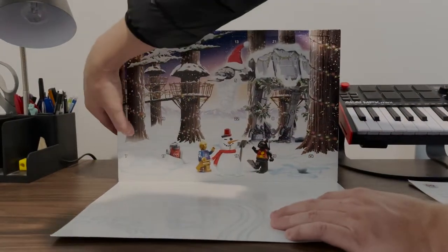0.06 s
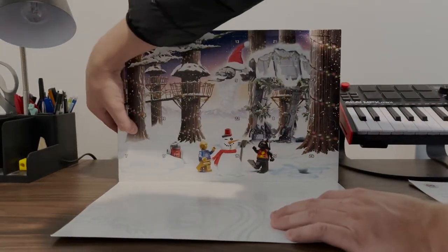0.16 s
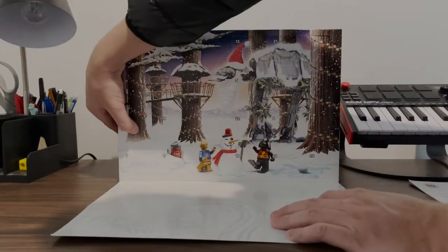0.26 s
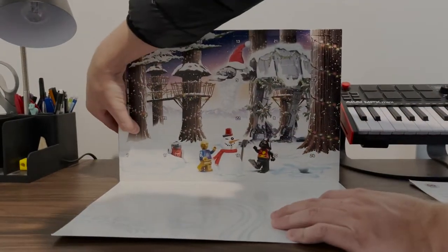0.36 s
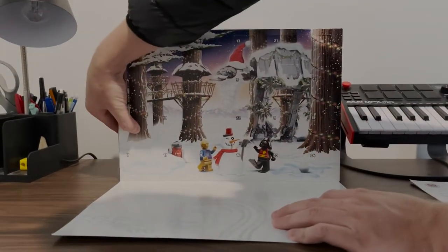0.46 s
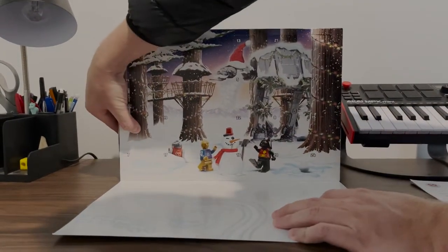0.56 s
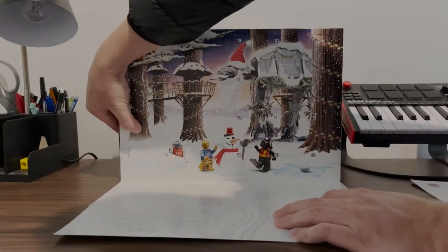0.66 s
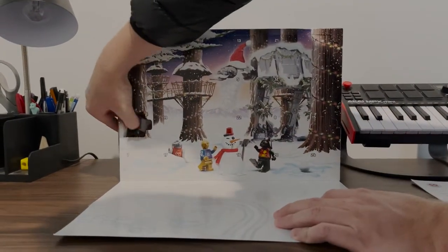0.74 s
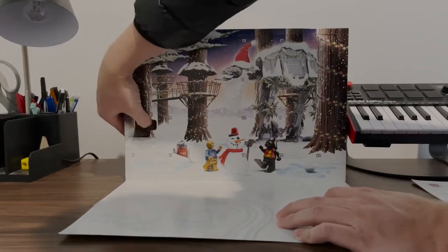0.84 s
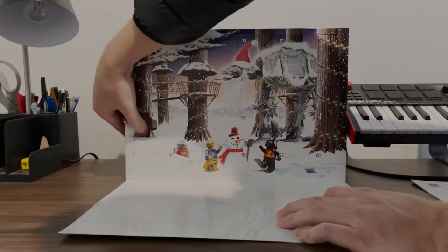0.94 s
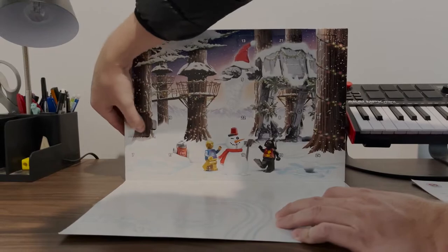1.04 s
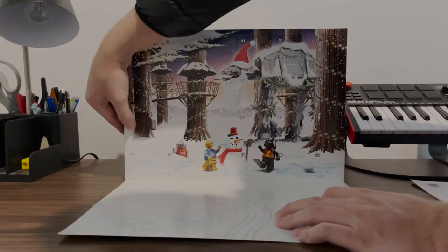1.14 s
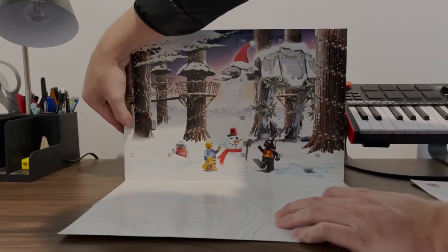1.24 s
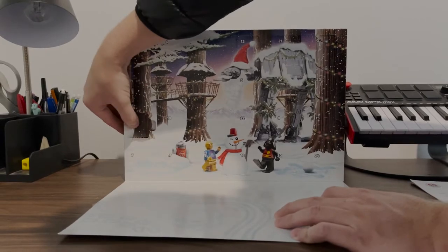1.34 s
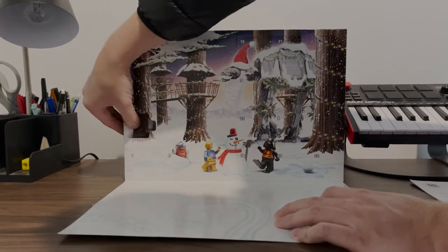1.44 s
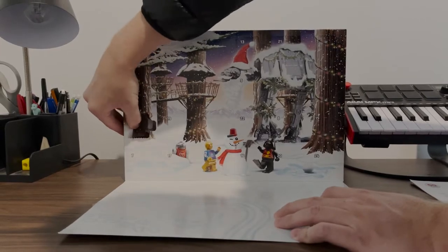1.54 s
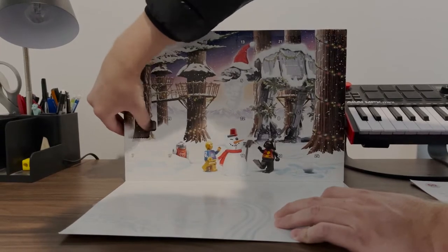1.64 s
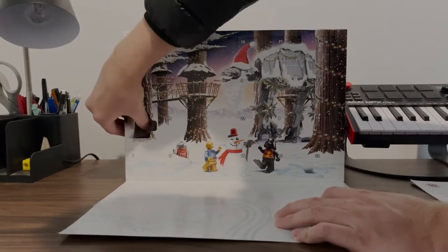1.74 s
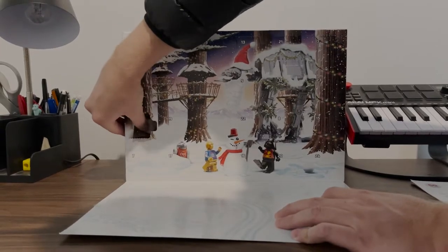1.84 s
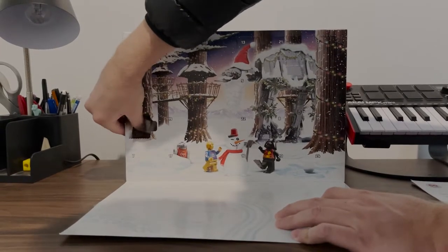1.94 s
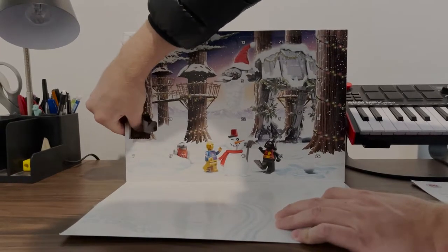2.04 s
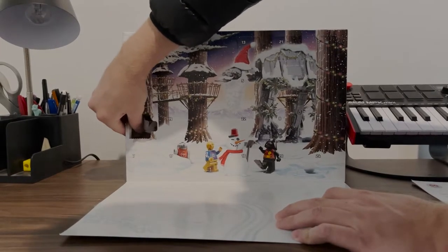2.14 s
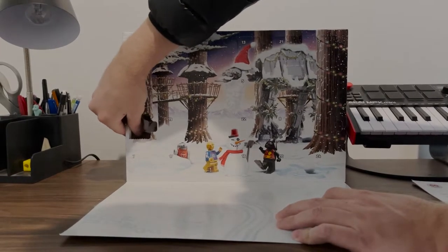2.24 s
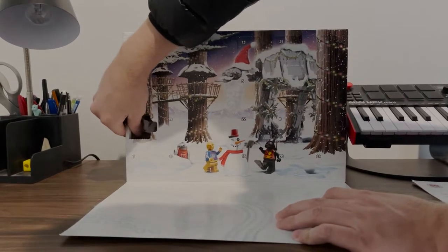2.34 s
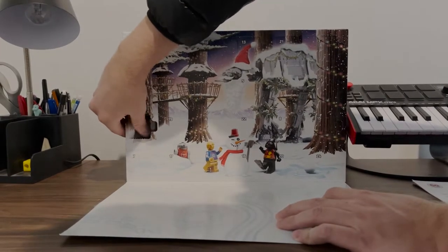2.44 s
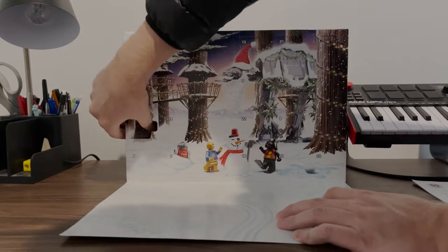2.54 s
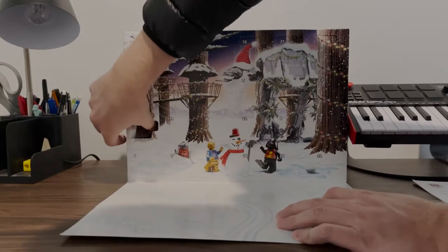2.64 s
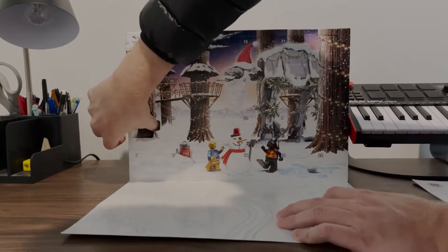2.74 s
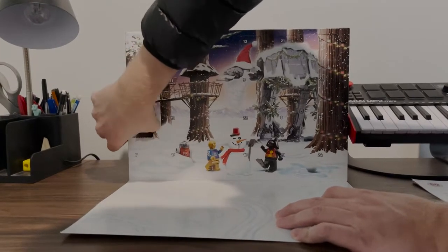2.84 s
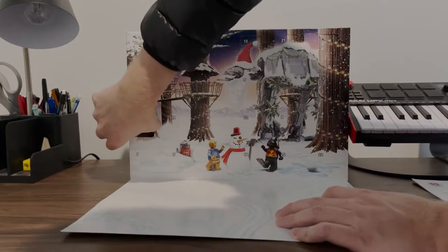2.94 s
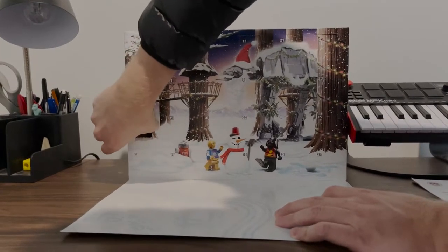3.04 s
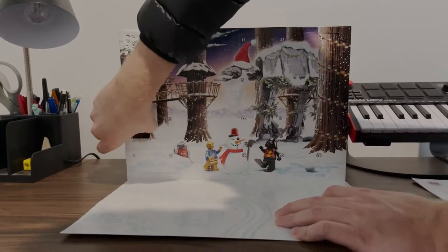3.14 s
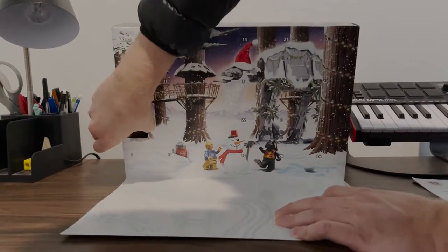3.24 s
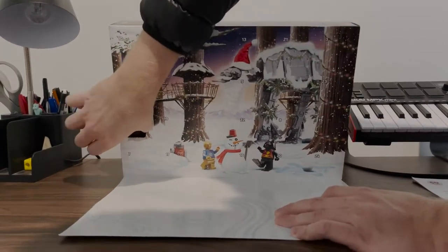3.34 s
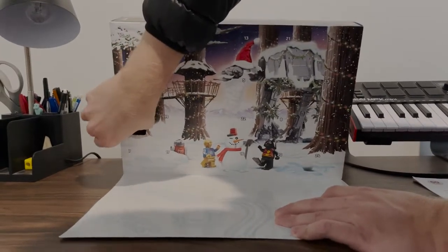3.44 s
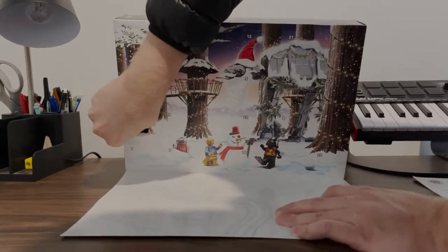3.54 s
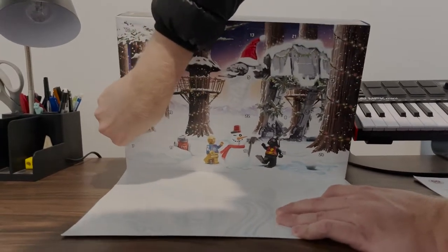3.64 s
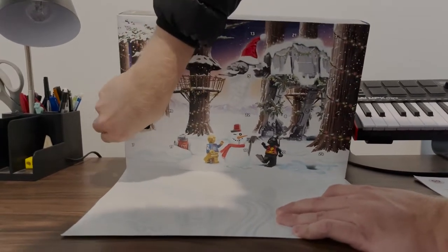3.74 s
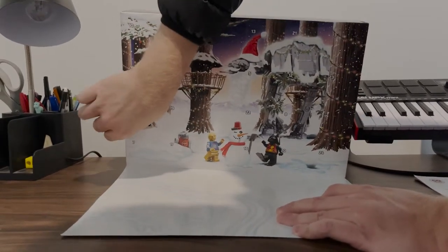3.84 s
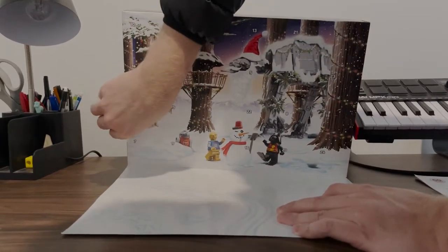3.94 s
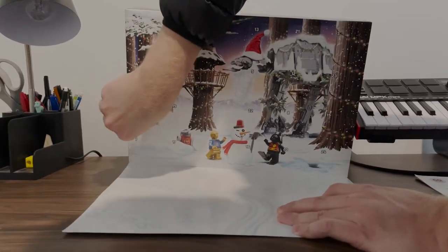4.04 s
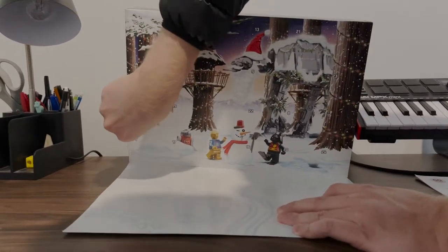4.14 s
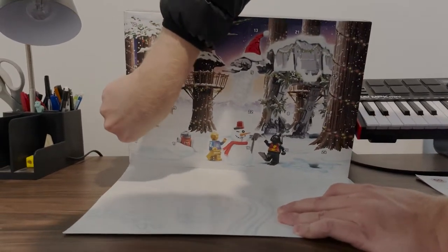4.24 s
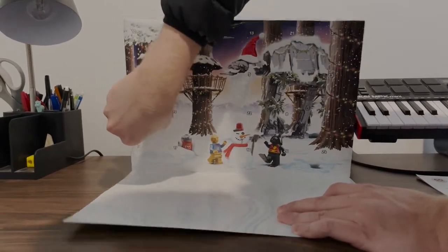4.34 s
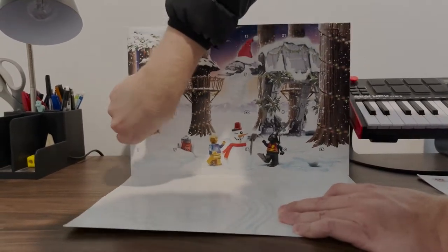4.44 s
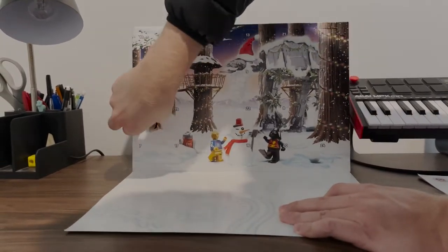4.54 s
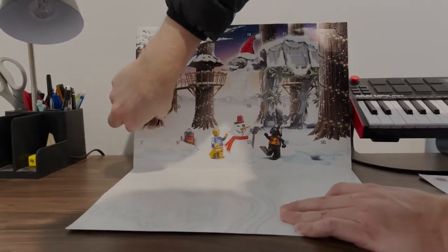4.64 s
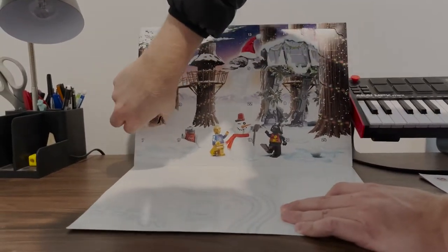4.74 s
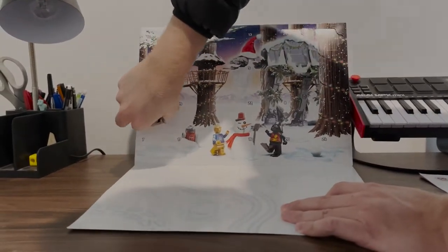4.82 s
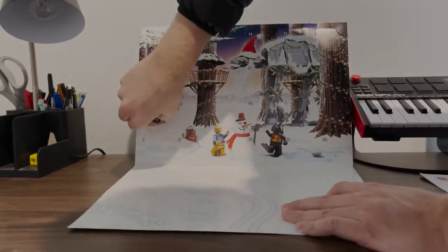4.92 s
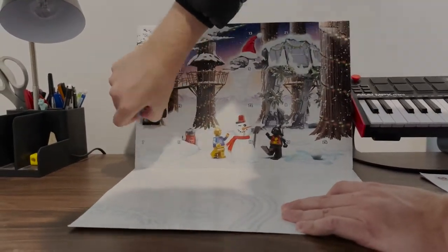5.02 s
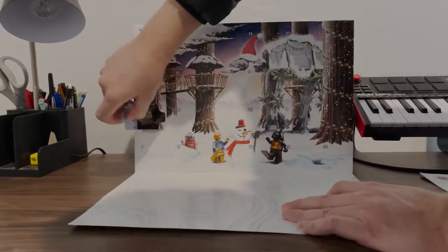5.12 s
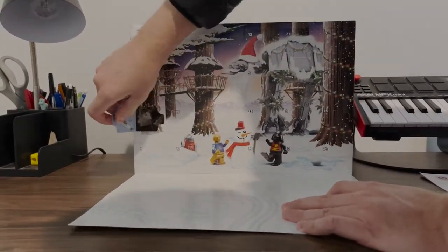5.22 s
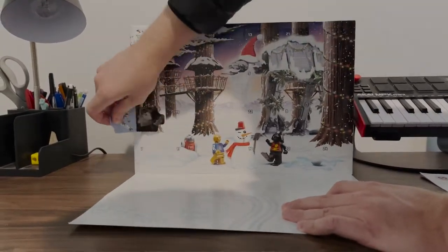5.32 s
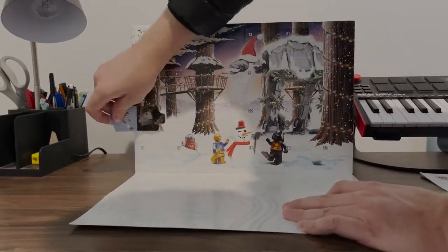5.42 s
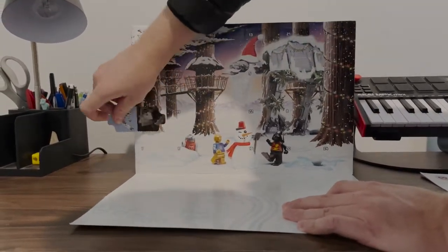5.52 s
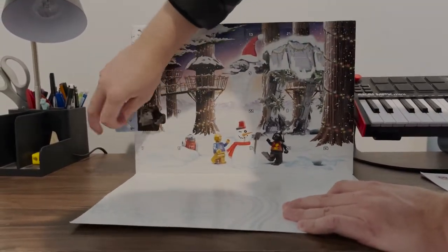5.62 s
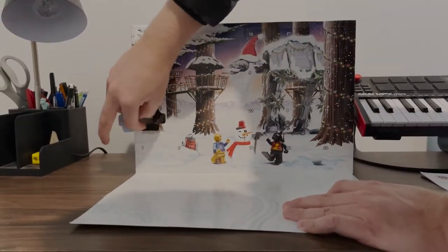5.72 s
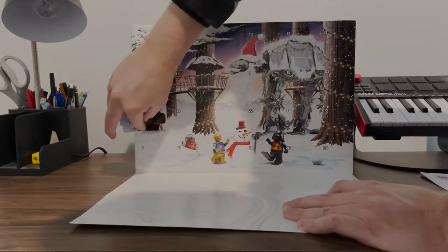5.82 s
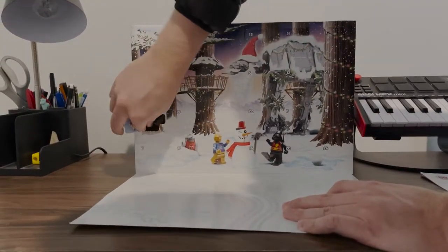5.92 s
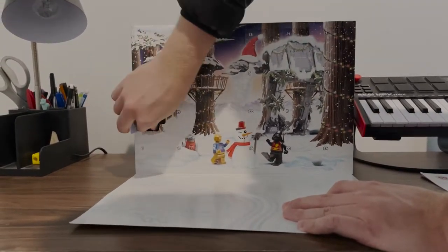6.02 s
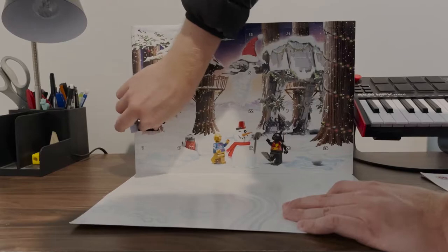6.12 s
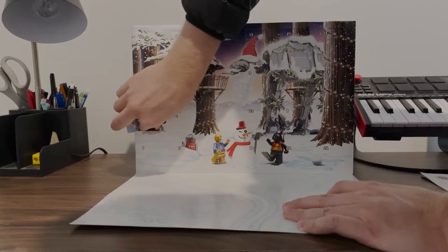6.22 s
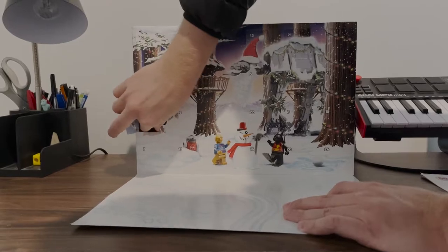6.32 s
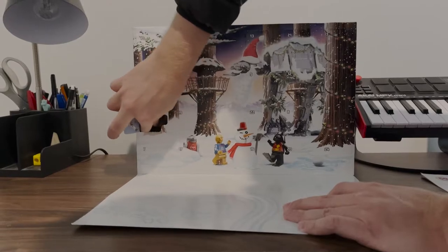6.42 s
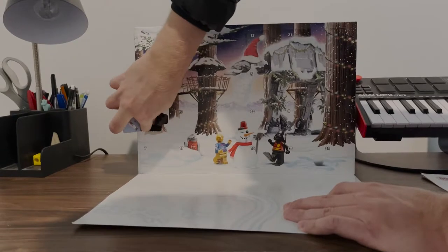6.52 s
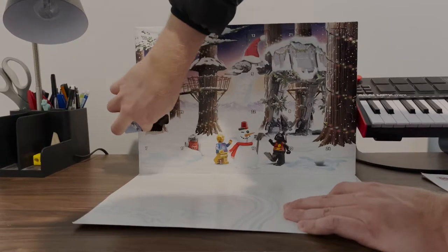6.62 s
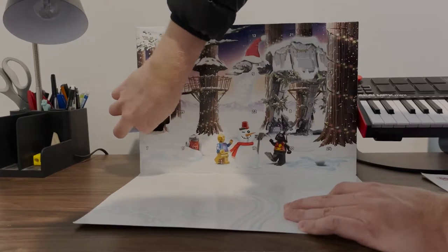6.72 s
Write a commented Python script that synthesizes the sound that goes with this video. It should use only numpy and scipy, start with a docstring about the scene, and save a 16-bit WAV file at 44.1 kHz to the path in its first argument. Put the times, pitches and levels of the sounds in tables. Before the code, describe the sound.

Close cardboard cracks and hollow thumping pops, loudest midway, separated by quiet finger scrapes and soft sleeve rustle in a quiet, bare room.

```python
"""A perforated door is pushed in and torn open in a cardboard calendar box on a desk, in a small bare room.
Paper bridges crack one by one or rip in quick runs, made from shaped noise bursts.
The hollow box pops as its face buckles, made from short swelling modes and gliding notes.
In between, fingers rub, scrape, catch and judder on the card and a jacket sleeve rustles, mostly from
random grains. Nearby scatter, room echoes and a quiet noise bed surround it all."""
import sys
import numpy as np
from scipy import signal
from scipy.fft import rfft, irfft, next_fast_len
from scipy.io import wavfile

SR = 44100
rng = np.random.default_rng(int(sys.argv[2]) if len(sys.argv) > 2 else 0)


def dump_mix(stems):
    """Bounce the given channels to the path in sys.argv[1] as a 16-bit WAV at rate SR."""
    frames = np.atleast_2d(stems).T  # one column per channel
    limited = np.clip(frames, -1, 1)  # hard clip at full scale
    pcm = np.round(limited * 32767).astype(np.int16)
    wavfile.write(sys.argv[1], SR, pcm)


N = 298632
TIME = np.arange(N) / SR  # seconds

# Source levels are set ahead of the room, the ports and the overall colour; all spectra are relative.
# Single cracks, loud and faint, at set times. Each row: start in seconds, treble level in dB,
# level of the card's midrange in dB before the trim shared by all cracks.
PLACED_CRACKS = [(0.615, -40.5, -46), (0.6377, -34.5, -47.5), (0.8207, -21.5, -34), (1.0172, -40.5, -41.5),
                 (1.0752, -29, -26.5), (1.3926, -41.5, -39), (1.559, -35, -40.5), (1.5769, -31.5, -36),
                 (1.8643, -22.5, -60), (1.9053, -28.5, -35), (1.9415, -27.5, -35), (1.981, -24, -30),
                 (1.9925, -22.5, -32), (2.104, -40, -52), (2.3594, -29, -30.5), (2.3737, -32, -45),
                 (2.398, -26, -37), (2.411, -23.5, -26), (2.4365, -26, -30), (2.6451, -40, -43.5),
                 (2.749, -36, -46), (2.787, -35.5, -36), (2.8191, -26, -38.5), (2.9594, -26, -30.5),
                 (3.0068, -30, -36), (3.018, -40.5, -27.5), (3.135, -33, -30), (3.926, -43, -39),
                 (3.96, -37, -36), (4.1229, -36, -39.5), (4.335, -25.5, -25.5), (4.356, -15.5, -19),
                 (4.486, -40, -31), (4.8393, -22, -24), (4.8601, -26, -14.5), (4.876, -27, -35),
                 (4.912, -30.5, -18), (4.9548, -30.5, -30), (5.4855, -39, -61), (5.7882, -36.5, -41),
                 (6.0732, -35, -42.5), (6.105, -39, -38.5), (6.172, -34, -48), (6.322, -39.5, -52),
                 (6.4202, -19, -27.5), (6.726, -24, -45)]
# More cracks at random moments in these spans. Each row: start in seconds, end in seconds,
# mean treble level in dB.
TEARING_SPANS = [(0.785, 0.846, -32), (1.79, 2.013, -40.5), (2.366, 2.447, -42), (2.747, 2.841, -41.5),
                 (4.931, 4.974, -37.5)]
CRACKLE_PER_S, CRACKLE_SPREAD_DB, CRACKLE_CARD_DB = 65, 0.5, -3.5
# The bright snap of a bridge. Each row: frequency in Hz, level in dB per Hz.
SNAP_SPECTRUM = [(1500, -16), (3500, -13.5), (5500, -2), (7500, 0.5), (9000, 6), (12000, 0.5)]
# The card around a break, before its random shift. Each row: frequency in Hz, level in dB per Hz.
CARD_SPECTRUM = [(300, -16), (700, -2), (1500, -0.5), (2700, -2.5), (5000, -8.5), (9000, -38.5)]
CARD_SPREAD_OCT = 0.49  # random pitch spread of the card, octaves
STRAIN_S = 0.004        # creaking lead-in to a break, seconds
SNAP_EVENNESS = 0.6     # 0: a ragged spectrum, 1: a smooth one
# A break drags a weaker one after it, deeper in the card: longest delay in seconds, level in dB
SPLINTER_S, SPLINTER_DB = 0.006, -11.5
# Runs of fibres giving way together. Each row: start in seconds, length before the fade in seconds,
# level in dB, treble shelf against the rest in dB.
RIP_RUNS = [(0.707, 0.0044, -11, 6), (1.689, 0.018, -47, -6), (2.733, 0.053, -43.5, -22),
            (4.287, 0.0069, -30, -2), (4.36, 0.017, -26, -7), (4.84, 0.031, -41, -38),
            (4.881, 0.0077, -32, -25), (4.943, 0.029, -34.5, -15), (5.419, 0.022, -49.5, 24),
            (6.4179, 0.0061, -25, -34), (6.722, 0.014, -40, -9.5), (6.763, 0.0057, -42, -25)]
# The rip ahead of its treble shelf. Each row: frequency in Hz, level in dB per Hz.
RIP_SPECTRUM = [(50, -13), (150, -2), (300, 3), (520, -0.5), (720, 5.5), (1000, -4.5), (1900, -5),
                (3000, -12.5), (6500, -15), (9000, -9.5), (12000, -14.5)]

# The face buckling or being bumped. Each row: start in seconds, level in dB before the shared trim,
# tuning in Hz that the box settles to.
FACE_POPS = [(0.122, -43.5, 405), (0.386, -41, 442), (0.49, -40, 350.6), (0.711, -18, 163.7),
             (0.719, -13.5, 398), (0.841, -32, 393), (1.559, -33, 302), (1.688, -36, 394),
             (2.35, -30.5, 430), (2.63, -27, 400), (3.378, -32.5, 392), (3.47, -36, 367), (3.602, -37, 378),
             (3.844, -40, 392.5), (3.88, -36, 351.5), (4.2811, -29, 401), (4.289, -16.5, 337),
             (4.358, -1.5, 387), (4.409, -18, 410), (4.843, -23.5, 403), (4.882, -13, 429),
             (4.889, -15.5, 423.3), (5.223, -38, 276.6), (6.075, -37, 432), (6.459, -28, 333),
             (6.595, -35.5, 399)]
# After each pop the face springs back: delay in seconds, level in dB, tuning as a share of the pop's
REBOUND_S, REBOUND_DB, REBOUND_PITCH = 0.019, -13, 0.62
# A torn flap springs free and rings. Each row: start in seconds, level in dB before the shared trim.
FREED_FLAPS = [(0.708, -19.5), (4.8845, -20.5), (6.422, -28.5)]
FLAP_HZ = 733  # box tuning while a flap rings
# Modes of the hollow box at its reference tuning. Each row: frequency in Hz, mean level in dB,
# swell and decay time in seconds.
BOX_MODES = [(59, -32.5, 0.034), (120.9, -21.5, 0.005), (187, -25.5, 0.0068), (254.5, -12, 0.0047),
             (401, -4, 0.0044), (559.5, -17.5, 0.0051), (748, -21, 0.0054), (1373, -35.5, 0.0027)]
BOX_HZ = 405  # reference tuning
# The pressed face going slack in a falling thump. Each row: start in seconds, level in dB,
# starting pitch in Hz, fall time in seconds.
FACE_SLUMPS = [(0.709, -20.5, 461.5, 0.015), (2.041, -49, 190, 0.04), (3.926, -33, 463.3, 0.029),
               (5.603, -51, 180, 0.06), (6.423, -18, 610, 0.0269)]
# Swell as a share of the fall time, overtone as a multiple of the note, overtone level in dB
SLUMP_SWELL_SHARE, SLUMP_OVERTONE, SLUMP_OVERTONE_DB = 0.31, 1.7, -14

# The hand moving on the card. Each row: start in seconds, end in seconds, rubbing level in dB,
# weight in dB (above 0 it leans on the box, below 0 it skims).
HAND_STROKES = [(0.241, 0.554, -55.5, -2), (0.838, 0.893, -38.5, -7), (1.392, 1.755, -59.5, 11),
                (1.804, 2.028, -56, -2), (2.354, 2.499, -48, -6), (2.73, 2.848, -42, -5.5),
                (3.242, 3.408, -50, -7), (3.479, 3.64, -57, 17.5), (3.922, 3.996, -50.5, 12.5),
                (4.283, 4.355, -32, 4), (4.37, 4.451, -31, 1.5), (4.705, 4.838, -55.5, -0.5),
                (4.844, 4.976, -33, -5.5), (5.204, 5.267, -54, 8), (5.519, 5.578, -60, -20),
                (5.774, 5.904, -55.5, -1), (6.036, 6.186, -55, 5.5), (6.315, 6.434, -54, 8.5),
                (6.557, 6.777, -51, 4)]
# A firmer stroke raises rumble and scraping by these dB per dB; weight trades scraping for rumble
USUAL_STROKE_DB = -50
RUMBLE_FOLLOWS, SCRAPE_FOLLOWS, WEIGHT_MUTES_SCRAPE = 0.98, 0.82, 0.27
# The box rumbling on the desk. Each row: frequency in Hz, level in dB per Hz.
RUMBLE_SPECTRUM = [(25, -17), (55, 3), (110, -0.5), (220, -6.5), (400, -43)]
# Skin on card, before the flexing shifts it. Each row: frequency in Hz, level in dB per Hz.
RUB_SPECTRUM = [(100, -23), (270, -3), (410, 1), (740, -4), (1000, -17), (1800, -34.5)]
# Colour laid over the scraping fibres. Each row: frequency in Hz, level in dB.
SCRAPE_COLOUR = [(500, -10), (850, -1.5), (1700, 1.5), (2800, -4.5), (5500, -10.5), (9000, -4),
                 (12000, -12.5)]
# A fingertip catching on the edge of the door. Each row: start in seconds, level in dB.
EDGE_CATCHES = [(0.89, -31), (1.507, -47.5), (2.552, -41.5), (3.162, -37), (3.361, -40), (3.475, -41),
                (3.5, -40), (3.531, -41), (3.554, -48), (3.757, -38.5), (4.084, -37), (5.422, -49),
                (5.791, -41), (6.041, -46), (6.348, -45.5)]
# Modes of the small door, before random detuning. Each row: frequency in Hz, mean level in dB,
# decay time in seconds.
DOOR_MODES = [(746, -9, 0.0025), (1400, -4, 0.00093), (1900, -5, 0.0011)]
# The fingertip judders in an even run of soft knocks, every second one weaker
JUDDER_START_S, JUDDER_STEP_S = 1.017, 0.0862
JUDDER_DB, JUDDER_WEAK_DB, JUDDER_HZ = -49.5, -3.5, 208.7

# The jacket sleeve as the arm moves, before its flutter. Each row: time in seconds, level in dB.
SLEEVE_MOVES = [(1.05, -62), (1.23, -68), (2.1, -64.5), (2.3, -70), (2.55, -60), (3.3, -57.5), (4.2, -65.5),
                (4.62, -60), (5.38, -70.5), (5.55, -58.5), (5.72, -83.5), (5.85, -61.5), (5.98, -84),
                (6.1, -55.5), (6.28, -82), (6.65, -61)]
# The rustle of the cloth. Each row: frequency in Hz, level in dB per Hz.
SLEEVE_SPECTRUM = [(60, -23), (400, 4.5), (800, -9.5), (2000, -15), (6500, -17.5), (9000, -12.5),
                   (12000, -23)]

# Scatter from the desk and the wall behind. Each row: frequency in Hz, level in dB.
NEARBY_SPECTRUM = [(300, -35), (800, -4), (2000, 3), (5000, -14), (9000, -12)]
# How fast the room dies away. Each row: frequency in Hz, time to fall 60 dB in seconds.
ROOM_DECAY = [(400, 0.4446), (2000, 0.4955), (6000, 0.36), (12000, 0.5)]
# How loud the room answers. Each row: frequency in Hz, echo level in dB.
ROOM_LEVEL = [(60, -7.5), (200, -4), (400, -8.5), (1000, -5.5), (3000, -3), (8000, -10), (12000, -15.5)]
# The quiet room. Each row: frequency in Hz, level in dB per Hz.
AMBIENCE_SPECTRUM = [(20, -16), (55, 2.5), (130, -3), (420, -4.5), (800, -11), (3000, -30.5), (6500, -33),
                     (9000, -18), (12000, -29)]
AMBIENCE_DB = -63.5
# Diffuse sound. Each row: frequency in Hz, left-right likeness from 0 to 1.
STEREO_LIKENESS = [(300, 0.92), (600, 0.25), (1200, 0.23), (6000, 1), (8000, 1)]
# Level between the microphone ports. Each row: frequency in Hz, left over right in dB.
PORT_LEVEL = [(380, 0.5), (700, 0.97), (1250, 4.6), (2000, 7.5), (7100, 2.7), (7800, 0.3)]
# Phase between the microphone ports. Each row: frequency in Hz, lead of the left in radians.
PORT_LEAD = [(250, 0.03), (800, 0.75), (1700, 0.9), (2250, 1.6), (6900, 0.83), (8000, 0.95), (12200, -6)]
# Overall colour: two narrow treble peaks with a dip between, then a steep fall towards 13 kHz.
# Each row: frequency in Hz, gain in dB.
OVERALL_COLOUR = [(20, -20), (48, 0), (9500, 1), (9900, 8.5), (10250, 0.5), (10800, 8), (11600, -1.5),
                  (12300, -15), (13000, -20.5)]
CUTOFF_HZ = 13100


def cracks(card_trim_db):
    """Each bridge snaps brightly, shakes the card round it and splinters a moment later."""
    out = np.zeros(N)
    for s, treble_db, card_db in list(PLACED_CRACKS) + crackle():
        card_level = card_db + card_trim_db
        snap = burst(SNAP_SPECTRUM, snap_s=0.00058, ring_s=0.006, ring_db=-15.5, creak_s=0.002, creak_db=-17.5)
        start = s - STRAIN_S
        add(out, start, from_db(treble_db) * snap + from_db(card_level) * card_crack())
        splinter = from_db(card_level + SPLINTER_DB) * card_crack()
        add(out, start + SPLINTER_S * rng.random(), splinter)
    return out


def crackle():
    """More cracks at random moments while the perforation parts, as rows like the placed ones."""
    rows = []
    for start, end, level_db in TEARING_SPANS:
        for _ in range(round((end - start) * CRACKLE_PER_S)):
            treble_db, card_db = level_db + CRACKLE_SPREAD_DB * rng.standard_normal(2)
            rows.append((rng.uniform(start, end), treble_db, card_db + CRACKLE_CARD_DB))
    return rows


def card_crack():
    """The card round a break rings in the midrange, a little higher or lower each time."""
    pitch = 2 ** (CARD_SPREAD_OCT * rng.standard_normal())
    spectrum = [(hz * pitch, db) for hz, db in CARD_SPECTRUM]
    return burst(spectrum, snap_s=0.00041, ring_s=0.0038, ring_db=-12.5, creak_s=0.00088, creak_db=-16.0)


def burst(spectrum, snap_s, ring_s, ring_db, creak_s, creak_db):
    """One break: a few fibres fail under strain, the rest go at once, and the card rings briefly."""
    t = TIME[:SR // 40] - STRAIN_S - 2 * snap_s  # 0 at the height of the snap
    creak = from_db(creak_db) * np.exp(-abs(t) / creak_s)
    ring = from_db(ring_db) * np.exp(-abs(t) / ring_s)
    shape = np.exp(-(t / snap_s) ** 2) + np.where(t < 0, creak, ring)
    fibres = rfft(rng.standard_normal(len(t)) * shape)
    evened = irfft(fibres / abs(fibres) ** SNAP_EVENNESS)
    sound = coloured(evened, spectrum)
    # every burst carries the energy of 1 ms at unit rms
    return sound / np.sqrt(np.sum(sound ** 2) / (SR / 1000))


def rips(stop_s, treble_hz, clump_db):
    """A tear races along the perforation: fibres break in dense clumps, then the card rings out."""
    out, t = np.zeros(N), TIME[:SR // 7]
    for s, length, level_db, treble_db in RIP_RUNS:
        shape = np.exp(-np.maximum(t - length, 0) / stop_s)
        clumps = from_db(clump_db * drift(500)[:len(t)])
        fibres = coloured(rng.standard_normal(len(t)) * clumps * shape, RIP_SPECTRUM)
        tear = filtered(fibres, lambda hz: from_db(treble_db * hz ** 2 / (hz ** 2 + treble_hz ** 2)))
        same_energy = np.sqrt(np.sum(shape ** 2) / np.sum(tear ** 2))
        add(out, s, from_db(level_db) * tear * same_energy)
    return out


def pops(level_db, scatter_db, tension, slacken_s):
    """The face flips and pumps the air in the box; the modes swell and die in a few cycles."""
    out, t = np.zeros(N), TIME[:SR // 6]
    hz, mode_db, swell = np.transpose(BOX_MODES)[:, :, None]
    # the strained card rings high at first and sinks as it slackens
    travel = t + tension * slacken_s * (1 - np.exp(-t / slacken_s))
    envelope = t / swell * np.exp(1 - t / swell)
    for s, blow_db, pitch_hz in blows():
        strength = from_db(mode_db + scatter_db * rng.standard_normal(hz.shape))
        modes = strength * envelope * np.sin(2 * np.pi * hz * pitch_hz / BOX_HZ * travel)
        add(out, s, from_db(blow_db + level_db) * modes.sum(axis=0))
    return out


def blows():
    """All that sets the box ringing: pops, their rebounds and freed flaps, as (s, dB, Hz)."""
    rebounds = [(s + REBOUND_S, db + REBOUND_DB, hz * REBOUND_PITCH) for s, db, hz in FACE_POPS]
    flaps = [(s, db, FLAP_HZ) for s, db in FREED_FLAPS]
    return list(FACE_POPS) + rebounds + flaps


def slumps():
    """The face loses tension, so its note and one overtone slide down while they swell and die."""
    out, t = np.zeros(N), TIME[:SR // 6]
    for s, level_db, start_hz, fall_s in FACE_SLUMPS:
        phase = 2 * np.pi * start_hz * fall_s * (1 - np.exp(-t / fall_s))
        age = t / (SLUMP_SWELL_SHARE * fall_s)
        note = np.sin(phase) + from_db(SLUMP_OVERTONE_DB) * np.sin(SLUMP_OVERTONE * phase)
        add(out, s, from_db(level_db) * (age * np.exp(1 - age)) ** 2 * note)
    return out


def fingers(rumble_db, scrape_db):
    """The pushed box rumbles on the desk, skin rubs its face, and card edges scrape in small grains."""
    _, _, rubbing, weight = np.transpose(HAND_STROKES)
    effort = rubbing - USUAL_STROKE_DB
    rumbling = RUMBLE_FOLLOWS * effort + weight + rumble_db
    scraping = SCRAPE_FOLLOWS * effort - WEIGHT_MUTES_SCRAPE * weight + scrape_db
    desk = slips(RUMBLE_SPECTRUM, per_s=880, spread_db=4.0, uneven_db=2.5)
    skin = flexing(slips(RUB_SPECTRUM, per_s=1300, spread_db=4.0, uneven_db=4.0), octaves=0.14, rate=35)
    edges = papery(per_s=1800, spread_db=4.5, uneven_db=4.0, sharpness=4.5, count=18)
    rumble = pressure(rumbling, ease_s=0.007) * desk
    rub = pressure(rubbing, ease_s=0.035) * skin
    scrape = pressure(scraping, ease_s=0.008) * edges
    return rumble + rub + scrape


def pressure(levels_db, ease_s):
    """Each stroke eases in, holds and eases out."""
    out = np.zeros(N)
    for (start, end, *_), level_db in zip(HAND_STROKES, levels_db):
        t, length = TIME[:SR], end - start
        ease = ease_s + length / 10
        ramps = np.minimum(t, length + ease - t) / ease
        add(out, start - ease / 2, from_db(level_db) * np.clip(ramps, 0, 1))
    return out


def slips(spectrum, per_s, spread_db, uneven_db):
    """Tiny slips, with a grip that comes and goes."""
    grip = from_db(uneven_db * drift(50))
    return rms_one(coloured(grains(per_s, spread_db) * grip, spectrum))


def flexing(x, octaves, rate):
    """The card bends under the hand: a wandering playback speed moves its resonances up and down."""
    position = np.cumsum(2 ** (octaves * drift(rate))) % N
    return np.interp(position, np.arange(N), x)


def papery(per_s, spread_db, uneven_db, sharpness, count):
    """Fibres flick past an edge, each with a short ring at one of a set of pitches."""
    clicks = grains(per_s, spread_db) * from_db(uneven_db * drift(40))
    dealt = rng.integers(0, count, N)  # which pitch each click sounds
    rings = np.zeros(N)
    for k, hz in enumerate(np.geomspace(600, 12000, count)):
        b, a = signal.iirpeak(hz, max(sharpness, 2), fs=SR)
        rings += signal.lfilter(b, a, clicks * (dealt == k) + 1e-18)
    return rms_one(coloured(rings, SCRAPE_COLOUR))


def catches(spread_oct, scatter_db):
    """A fingertip slips off the edge of the door, which ticks woodily, its modes randomly detuned."""
    out, t = np.zeros(N), TIME[:SR // 20]
    hz, mode_db, decay = np.transpose(DOOR_MODES)[:, :, None]
    for s, level_db in EDGE_CATCHES:
        detune, uneven = rng.standard_normal((2, *hz.shape))
        strength = from_db(mode_db + scatter_db * uneven)
        tones = np.sin(2 * np.pi * hz * 2 ** (spread_oct * detune) * t)
        modes = strength * np.exp(-t / decay) * tones
        add(out, s, from_db(level_db) * modes.sum(axis=0))
    return out


def judder(swell_s, count):
    """Each slip of the fingertip makes the face hum for a few cycles."""
    out, t = np.zeros(N), TIME[:SR // 6]
    hum = (t / swell_s * np.exp(1 - t / swell_s)) ** 2 * np.sin(2 * np.pi * JUDDER_HZ * t)
    for k in range(count):
        level_db = JUDDER_DB + k % 2 * JUDDER_WEAK_DB
        add(out, JUDDER_START_S + k * JUDDER_STEP_S, from_db(level_db) * hum)
    return out


def sleeve(per_s, spread_db, uneven_db):
    """Cloth folds slide over one another in faint, fine grains."""
    level_db = np.interp(TIME, *np.transpose(SLEEVE_MOVES)) + uneven_db * drift(25)
    return from_db(level_db) * rms_one(coloured(grains(per_s, spread_db), SLEEVE_SPECTRUM))


def nearby(x, delay_s, fade_s):
    """Things on the desk scatter the sound back within a few milliseconds."""
    t = TIME[:SR // 20]
    fade = (t > delay_s) * np.exp(-t / fade_s)
    scatter = diffuse(size=len(t)) * fade / np.sqrt(np.sum(fade ** 2))
    response = coloured(scatter, NEARBY_SPECTRUM)
    return signal.fftconvolve(x[None], response, axes=1)[:, :N]


def room(x, build_s):
    """Dense wall echoes build up quickly and die away, each octave at its own rate."""
    t, centres = TIME[:SR], 62.5 * 2.0 ** np.arange(9)
    noise, response = diffuse(size=SR), 0
    for hz, share in zip(centres, np.eye(len(centres))):
        # neighbouring bands crossfade
        band = filtered(noise, lambda f: at_hz(np.column_stack([centres, share]), f))
        decay = from_db(-60 * t / at_hz(ROOM_DECAY, hz)) * (1 - np.exp(-t / build_s))
        level = from_db(at_hz(ROOM_LEVEL, hz)) / np.sqrt(np.sum(decay ** 2))
        response = response + band * decay * level
    return signal.fftconvolve(x[None], response, axes=1)[:, :N]


def quiet_room():
    """A steady bed of diffuse noise, coloured as the room at rest."""
    return from_db(AMBIENCE_DB) * rms_one(coloured(diffuse(size=N), AMBIENCE_SPECTRUM))


def diffuse(size):
    """Stereo noise from all round: mid and side are balanced to set the likeness at each frequency."""
    mid, side = rng.standard_normal((2, size))
    mid = filtered(mid, lambda hz: np.sqrt((1 + np.clip(at_hz(STEREO_LIKENESS, hz), 0, 1)) / 2))
    side = filtered(side, lambda hz: np.sqrt((1 - np.clip(at_hz(STEREO_LIKENESS, hz), 0, 1)) / 2))
    return np.array([mid + side, mid - side])


def ports(x):
    """The two microphone ports differ in level and phase, half the difference on each side."""
    half = np.array([[0.5], [-0.5]])

    def response(hz):
        return from_db(half * at_hz(PORT_LEVEL, hz)) * np.exp(1j * half * at_hz(PORT_LEAD, hz))
    return filtered(x, response)


def grains(per_s, spread_db):
    """Random clicks of uneven size."""
    sizes = from_db(spread_db * np.minimum(rng.exponential(1, N), 4)) * rng.choice([-1, 1], N)
    return rms_one(sizes * (rng.random(N) < per_s / SR))


def drift(rate):
    """A random wander of unit rms, heading for this many new values a second."""
    knots = rng.standard_normal(4096)
    return rms_one(np.interp(TIME * rate, np.arange(len(knots)), knots))


def from_db(db):
    """Decibels to gain."""
    return 10 ** (np.asarray(db) / 20)


def rms_one(x):
    """Scale to unit rms."""
    return x / np.sqrt(np.mean(x ** 2) + 1e-20)


def at_hz(points, hz):
    """Read a table on a log-frequency axis."""
    f, value = np.transpose(points)
    return np.interp(np.log(np.maximum(hz, 1)), np.log(f), value)


def filtered(x, response):
    """Apply a response, given as a function of Hz."""
    n = x.shape[-1]
    size = next_fast_len(n + 4096)
    hz = np.arange(size // 2 + 1) * SR / size
    return irfft(rfft(x, size) * response(hz), size)[..., :n]


def coloured(x, spectrum):
    """Shape x with a spectrum in dB."""
    return filtered(x, lambda hz: from_db(at_hz(spectrum, hz)))


def add(track, s, sound):
    """Mix a sound into a track at time s."""
    i = max(round(s * SR), 0)
    part = sound[:max(N - i, 0)]
    track[i:i + len(part)] += part


def scene():
    """The box close by, its echoes, and the quiet room."""
    box = cracks(card_trim_db=-6.0) + rips(stop_s=0.0056, treble_hz=2540, clump_db=1.0)
    box = box + pops(level_db=0.5, scatter_db=1.5, tension=0.15, slacken_s=0.006) + slumps()
    box = box + fingers(rumble_db=-61.5, scrape_db=-60.0)
    box = box + catches(spread_oct=0.25, scatter_db=2) + judder(swell_s=0.0081, count=7)
    box = box + sleeve(per_s=2600, spread_db=3.5, uneven_db=3.5)
    echoes = nearby(box, delay_s=0.001739, fade_s=0.00084) + room(box, build_s=0.001)
    return ports(box + echoes + quiet_room())


def record(dry):
    """The overall colour is laid on, the highest peaks are rounded and the top is cut."""
    sound = coloured(dry, OVERALL_COLOUR)
    rounded = sound / (1 + (sound / 0.92) ** 6) ** (1 / 6)
    top_cut = signal.ellip(8, 0.3, 60, CUTOFF_HZ, fs=SR, output="sos")
    return signal.sosfilt(top_cut, rounded)


dry = scene()
out = record(dry)
dump_mix(out)
```